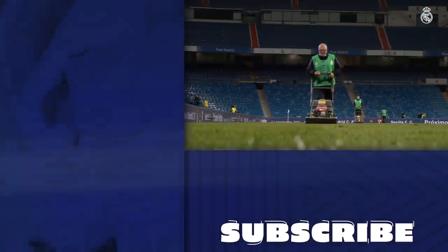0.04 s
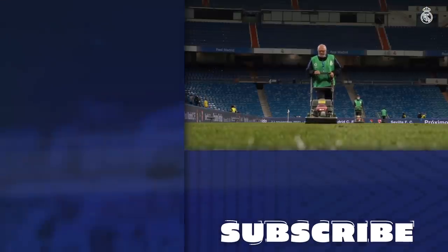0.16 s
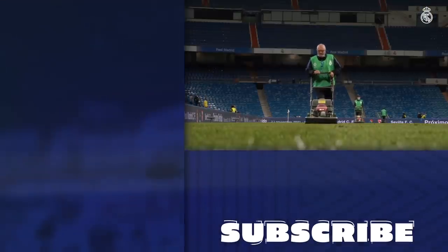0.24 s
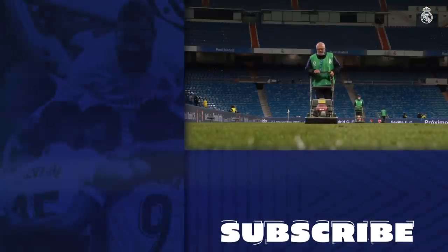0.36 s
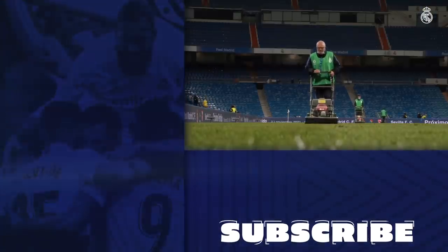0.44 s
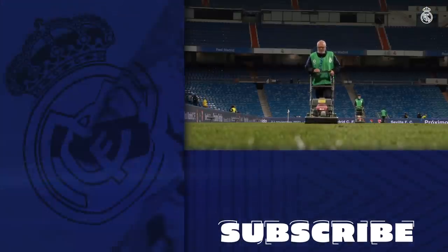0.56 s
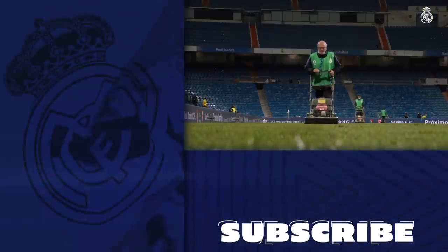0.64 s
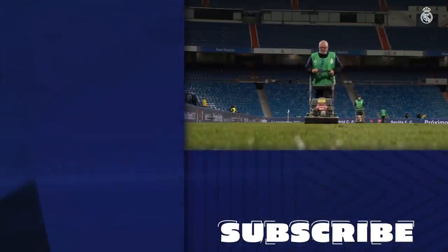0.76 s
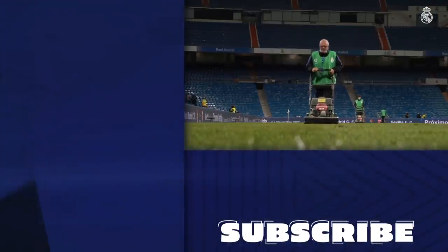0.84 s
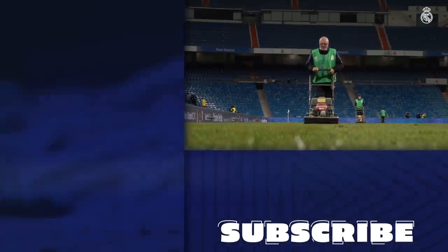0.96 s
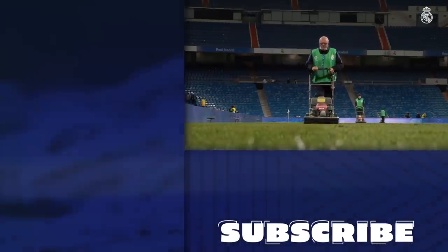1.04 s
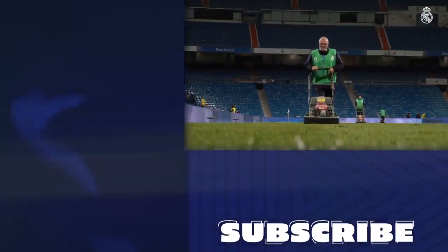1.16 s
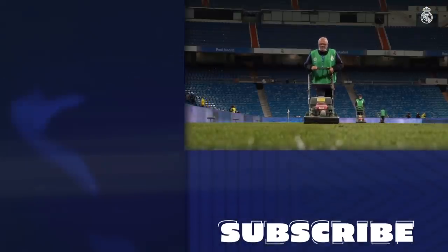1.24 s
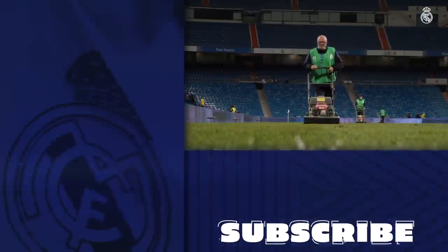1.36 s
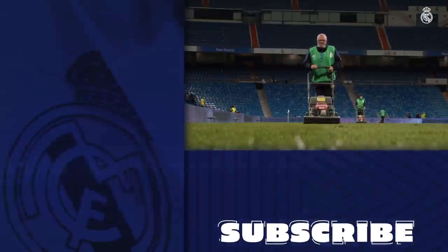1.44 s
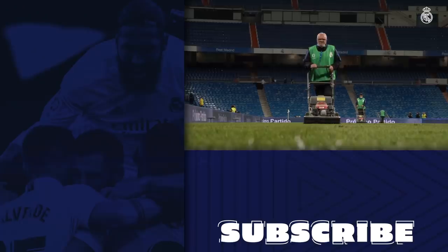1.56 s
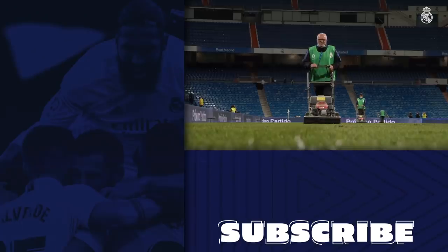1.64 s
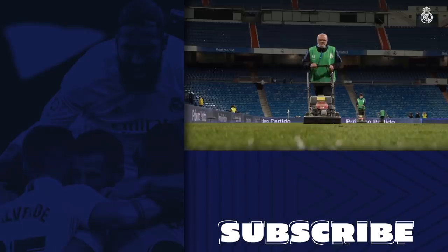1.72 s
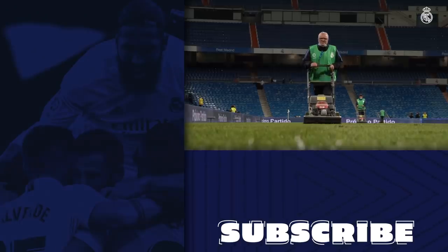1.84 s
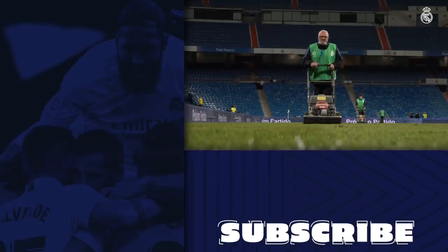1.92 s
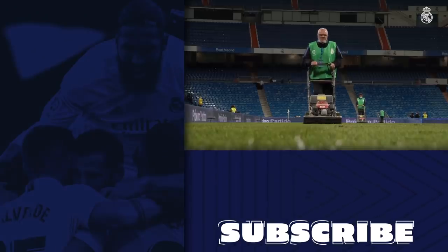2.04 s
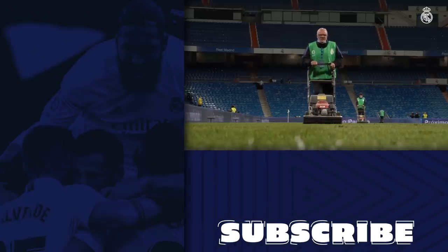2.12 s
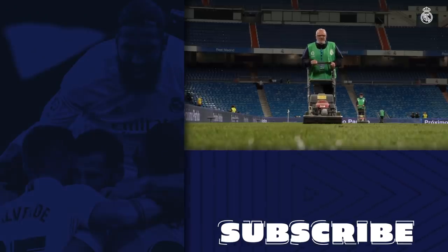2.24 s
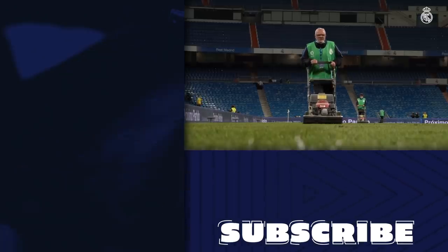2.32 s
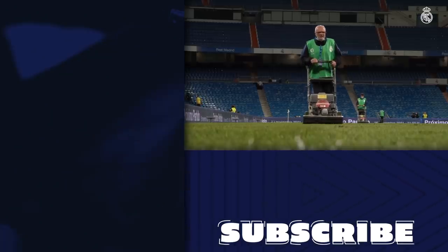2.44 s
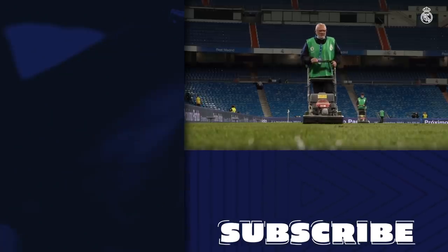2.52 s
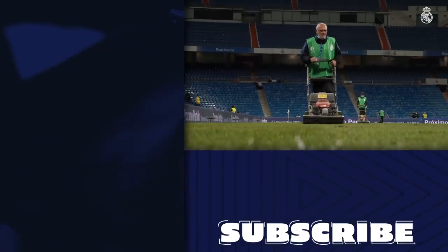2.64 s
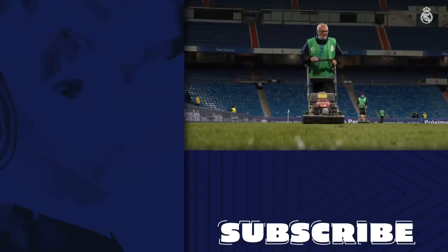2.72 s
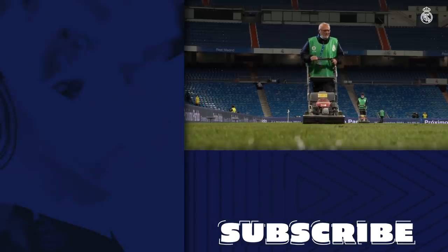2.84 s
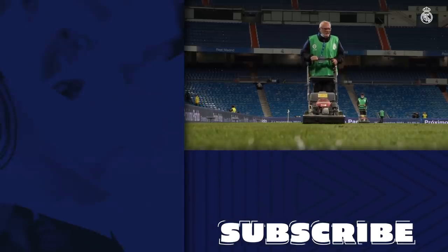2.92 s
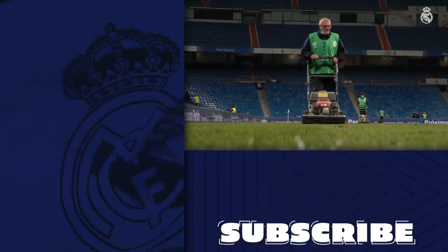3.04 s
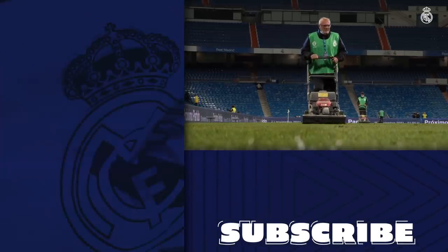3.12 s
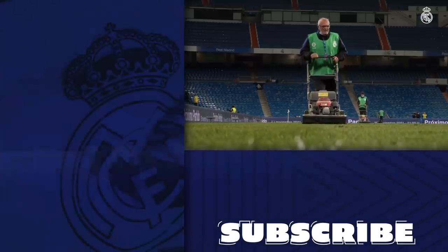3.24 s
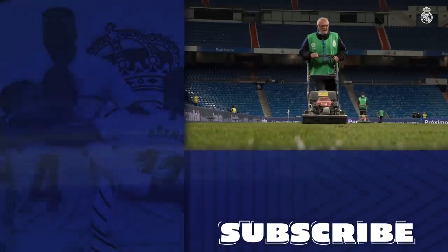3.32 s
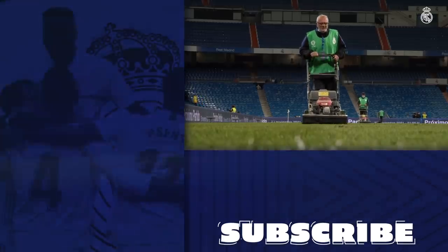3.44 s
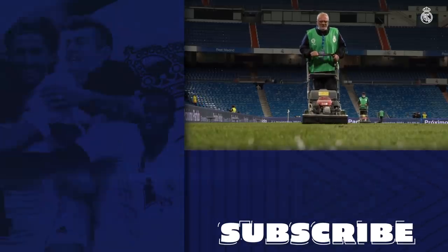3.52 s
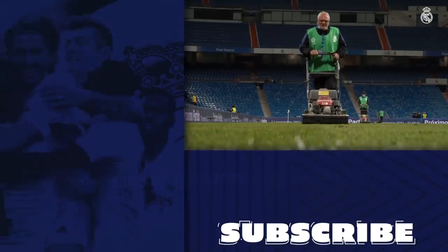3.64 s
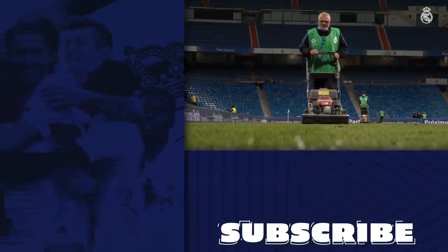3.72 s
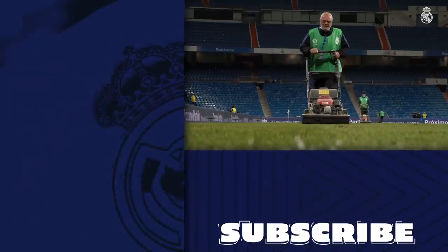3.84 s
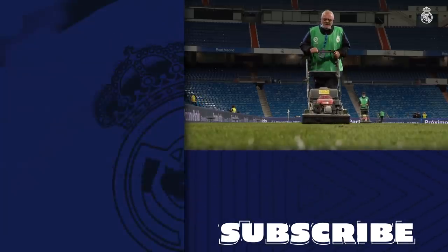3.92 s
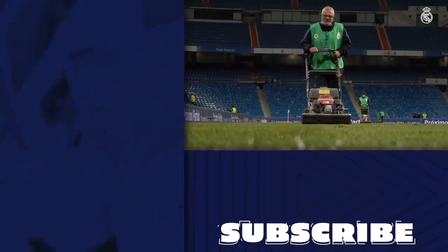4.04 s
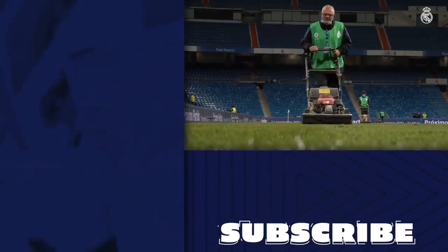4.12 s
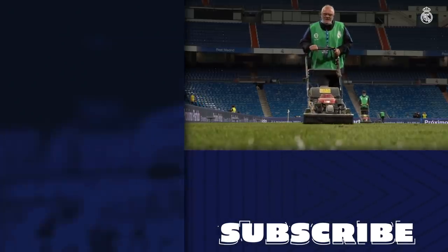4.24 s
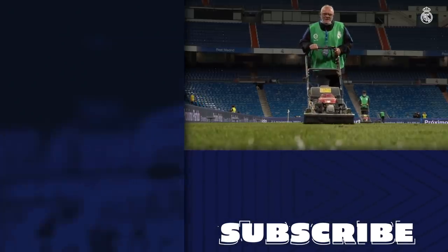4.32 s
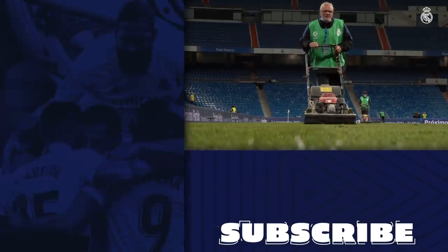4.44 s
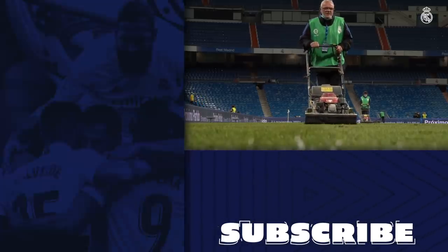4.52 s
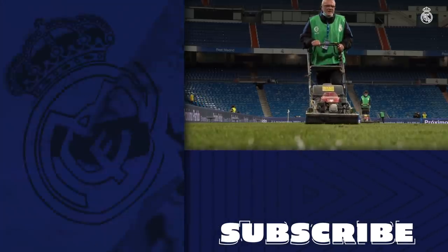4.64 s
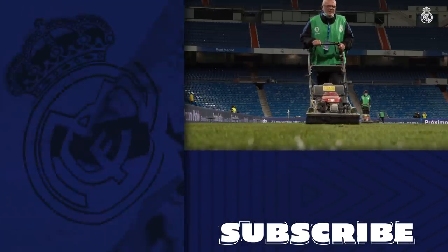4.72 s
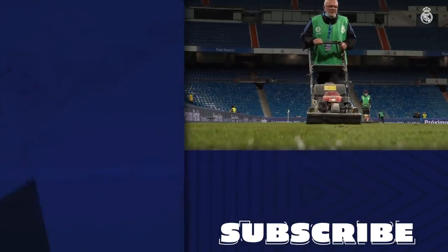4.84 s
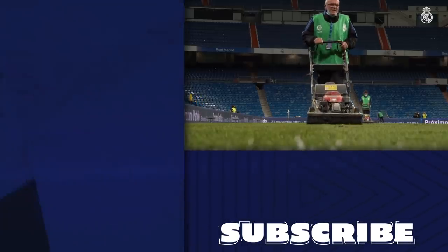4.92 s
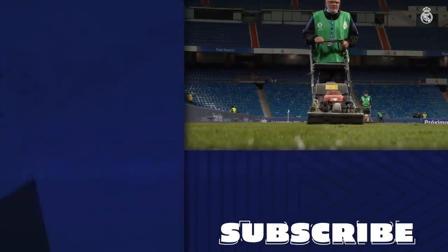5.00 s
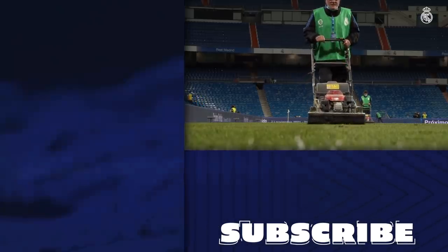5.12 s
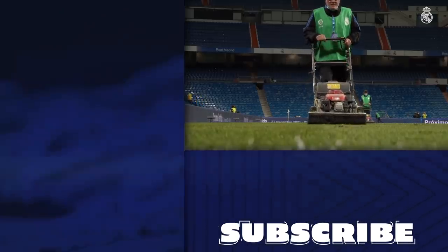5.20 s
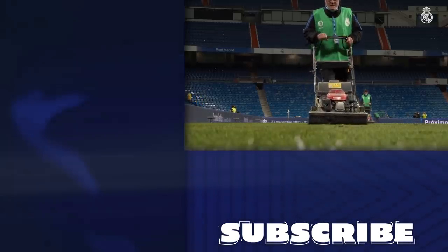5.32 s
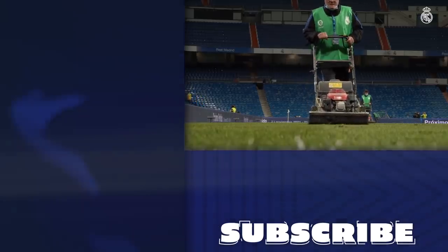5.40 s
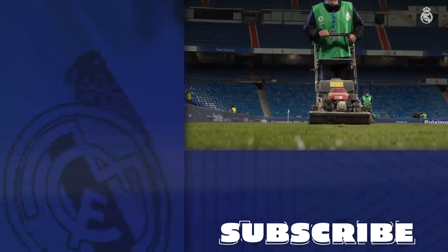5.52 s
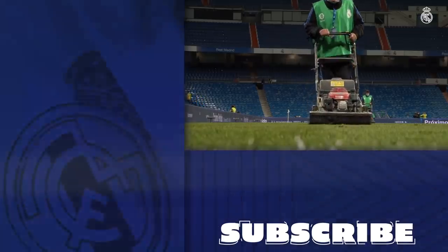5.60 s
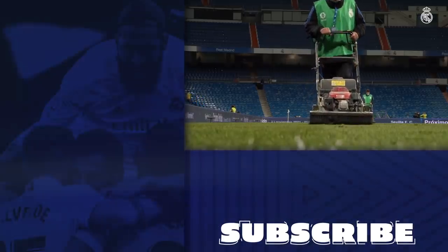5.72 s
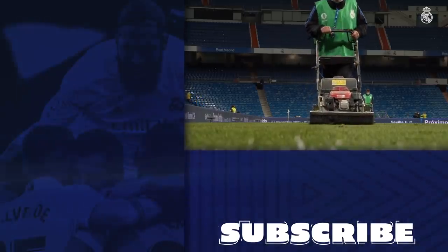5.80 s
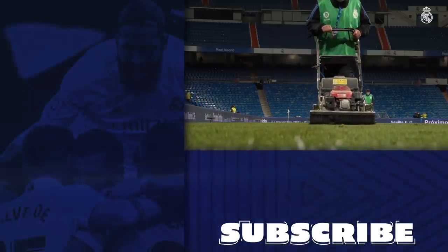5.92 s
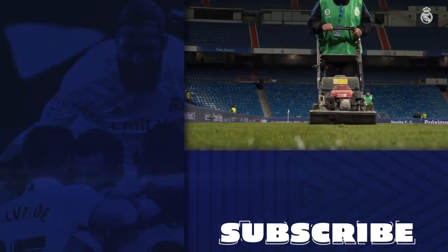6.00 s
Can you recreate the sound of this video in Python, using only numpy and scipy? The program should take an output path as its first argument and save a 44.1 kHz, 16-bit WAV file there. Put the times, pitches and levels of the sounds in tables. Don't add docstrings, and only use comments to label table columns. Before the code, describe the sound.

A single-cylinder petrol mower runs without pause, about thirty rapid exhaust thumps a second blending into a rough, buzzing putter. A strong low blade hum beats gently against it, with airy roar and fine metallic ticking above. Pushed over stadium grass towards a low, fixed microphone, it gradually grows louder and brighter. The stand returns a close, blurred echo, and distant mowers drone faintly.

```python
import sys
import numpy as np
from scipy import signal
from scipy.fft import rfft, irfft
from scipy.io import wavfile
from scipy.ndimage import uniform_filter1d

SR = 44100
rng = np.random.default_rng(int(sys.argv[2]) if len(sys.argv) > 2 else 0)


def master(y):
    cut = np.clip(np.atleast_2d(y).T, -1, 1)
    pcm = np.round(cut * 32767)
    wavfile.write(sys.argv[1], SR, pcm.astype(np.int16))


def invert_db(x):
    u = np.asarray(x, float) / 20
    return 10 ** u


N = 267378
TIME = np.arange(N) / SR
START_M, WALK_M_PER_S = 12.0, 1.0
ROAR_DB = -30.5
POP_CYCLE, THUMP_CYCLE = .862, .905
BLADE_RATIO = 3.9867
ECHO_RATE = 1 - .384 / 343
ECHO_CYCLE, ECHO_TURN = .694, .165


def rms_one(x):
    return x / np.sqrt(np.mean(x ** 2) + 1e-20)


def drift(rate):
    r = np.exp(-80 * np.pi * rate / SR)
    noise = rng.standard_normal(N // 40 + 2002)
    slow = signal.lfilter([1], [1, -2 * r, r * r], noise)[2000:]
    slow = rms_one(slow - slow.mean())
    return np.interp(np.arange(N) / 40, np.arange(len(slow)), slow)


def coloured(spectrum):
    hz = np.arange(1, N // 2 + 2) * SR / N
    point_hz, point_db = np.transpose(spectrum)
    db = np.interp(np.log(hz), np.log(point_hz), point_db, left=-90, right=-90)
    return irfft(rfft(rng.standard_normal(N)) * invert_db(db), N)


def band(x, low_hz, high_hz):
    return signal.sosfilt(signal.butter(2, [low_hz, high_hz], "band", fs=SR, output="sos"), x)


def resonance(x, hz, width_hz):
    r = np.exp(-np.pi * width_hz / SR)
    poles = [1, -2 * r * np.cos(2 * np.pi * hz / SR), r * r]
    return signal.lfilter([(1 - r * r) / 2, 0, (r * r - 1) / 2], poles, x)


def strikes(cycles, point, spread_db):
    turn = np.floor(cycles - point).astype(int) + 1
    strength = invert_db(spread_db * np.clip(rng.standard_normal(200), -2, 2))
    return np.diff(turn, prepend=turn[0]) * strength[turn] + 1e-18


def tone(db, cycles):
    return np.sqrt(2) * invert_db(db) * np.cos(2 * np.pi * cycles)


def nearing_db():
    return -20 * np.log10(1 - WALK_M_PER_S * TIME / START_M)


# [level_db of orders 1, 2, 3 ..]
FAR_MOWERS = [
    (32.87, [-60, -46, -52, -34, -44, -37, -39, -48, -48, -50, -55, -42]),
    (34.7, [-62, -50, -54, -37, -49, -47, -50, -52]),
    (26.75, [-58, -49, -58, -56, -57]),
]


def distant_mowers():
    out = np.zeros(N)
    for firings_per_s, levels_db in FAR_MOWERS:
        cycles = np.cumsum(firings_per_s * (1 + 0.00383 * drift(0.466))) / SR
        for order, db in enumerate(levels_db, 1):
            out += tone(db + 3.34 * drift(1.26), order * cycles + rng.random())
    return out


# start_s (its middle), half_length_s, level_db, low_hz, high_hz
CLIPPINGS = (2.63, .08, -58, 5200, 7300)


def swish():
    middle_s, half_s, db, low_hz, high_hz = CLIPPINGS
    swell = np.exp(-((TIME - middle_s) / half_s) ** 2)
    return invert_db(db) * swell * rms_one(band(rng.standard_normal(N), low_hz, high_hz))


# pitch_hz, level_db (per Hz)
HISS_SPECTRUM = [(2500, -33), (4200, 1.5), (4750, -3), (5400, -2.5), (8000, -6), (9600, -9), (10700, -8.5),
                 (12000, -13.5), (13600, -15), (15900, -20)]
# level_6k_db, level_12k_db (over the hiss), decay_ms
CONTACTS = [
    (5, 12, 2.0),
    (-1, 8, 2.6),
    (-4, 0, 1.6),
]
CONTACT_CYCLES = (.862, .155, .440)


def contact_db(low_db, high_db, hz):
    return low_db + np.log2(hz / 6000) * (high_db - low_db)


def hiss_and_ticks(cycles):
    hiss, out = rms_one(coloured(HISS_SPECTRUM)), np.zeros(N)
    edges_hz = [2500, 4400, 5800, 7200, 8600, 10000, 11500, 13000, 14500, 16500]
    blows = [strikes(cycles, point, spread_db=1.5) for point in CONTACT_CYCLES]
    for low, high in zip(edges_hz, edges_hz[1:]):
        flare = 1
        for point, blow, (low_db, high_db, decay_ms) in zip(CONTACT_CYCLES, blows, CONTACTS):
            level = invert_db(contact_db(low_db, high_db, np.sqrt(low * high)))
            clicks = blow * strikes(cycles, point, spread_db=0.0) * level
            flare = flare + signal.lfilter([1], [1, -np.exp(-1000 / (decay_ms * SR))], clicks)
        out += band(flare * band(hiss, low, high), low, high)
    return rms_one(out)


# pitch_hz, level_db, t60_s
VALVE_MODES = [(5900, -3, .010), (7550, -2, .012), (8850, -3, .010), (10400, 0, .014), (10950, -1, .012),
               (12600, -6, .010), (13250, -5, .012), (13850, -7, .010), (15200, -10, .008)]


def valve_rings(cycles):
    out = np.zeros(N)
    for hz, db, t60_s in VALVE_MODES:
        clicks = 0
        for point, (low_db, high_db, _) in zip(CONTACT_CYCLES, CONTACTS):
            clicks = clicks + strikes(cycles, point, spread_db=6.5) * invert_db(contact_db(low_db, high_db, hz))
        r, w = invert_db(-60 / (t60_s * SR)), 2 * np.pi * hz / SR
        out += signal.lfilter([0, invert_db(db) * np.sin(w)], [1, -2 * r * np.cos(w), r * r], clicks)
    return rms_one(out)


def bright_top(cycles):
    turf_db = 0.84 * WALK_M_PER_S * TIME
    db = -61.5 + nearing_db() + turf_db + 0.5 * drift(6.5)
    return invert_db(db) * (hiss_and_ticks(cycles) + invert_db(-13.5) * valve_rings(cycles))


# multiple (of firing rate), level_db (against the roar)
FAN_ORDERS = [(17, -25.5), (34, -16), (51, -21.5)]


def fan_whine(cycles):
    return sum(tone(db + 3 * drift(4.6), k * (cycles + 0.0054 * drift(2.26))) for k, db in FAN_ORDERS)


def panel_ring():
    once = resonance(rng.standard_normal(N), 3896, 90)
    return invert_db(-36.5) * rms_one(resonance(once, 3896, 90))


# pitch_hz, width_hz, level_db
MUFFLER_MODES = [(540, 260, 2), (760, 240, 0), (1140, 240, -1.5), (1520, 260, -11)]


def pops(cycles):
    clicks = -strikes(cycles, POP_CYCLE, spread_db=1.3)
    soft = signal.sosfilt(signal.butter(8, 1580, fs=SR, output="sos"), clicks)
    return rms_one(sum(invert_db(db) * resonance(soft, hz, width_hz) for hz, width_hz, db in MUFFLER_MODES))


def echoed_pops(cycles):
    echo = band(pops(cycles * ECHO_RATE + ECHO_CYCLE), 300, 750)
    return invert_db(-6.9) * (pops(cycles) + invert_db(-7) * echo)


# pitch_hz, level_db (per Hz)
ROAR_SPECTRUM = [(20, -35.5), (45, -32), (110, -13), (230, 2), (330, 1), (650, -1.5), (1150, -2),
                 (1550, -9.5), (1850, -14.5), (2400, -36), (3000, -28), (3750, -24), (4300, -35),
                 (5500, -47.5)]
# pitch_hz, level_db (per Hz)
RASP_SPECTRUM = [(1500, -20), (1800, -4), (2000, 2.5), (2500, -5), (2900, -9.5), (3400, -24)]


def air(cycles):
    near_db = nearing_db()
    roar = coloured(ROAR_SPECTRUM)
    roar = roar / np.std(band(roar, 450, 1700))
    puff = uniform_filter1d(np.exp(-((cycles - POP_CYCLE) % 1) / 0.027), size=70)
    blade_db = 1.1 * np.cos(2 * np.pi * BLADE_RATIO * cycles)
    chop = invert_db(blade_db + 0.4 * puff + 0.58 * drift(5.3))
    body = invert_db(-3.5) * chop * roar + fan_whine(cycles) + panel_ring() + echoed_pops(cycles)
    rasp = invert_db(-60 + 3.19 * near_db) * chop * rms_one(coloured(RASP_SPECTRUM))
    return invert_db(ROAR_DB + near_db) * body + rasp + bright_top(cycles)


# multiple (of pass rate), level_db (against the roar), echo_db (against the direct sound)
BLADE_LOWER = [(1, 4.7, -28), (2, -5, -10.5), (3, -2.4, -13)]
# multiple (of pass rate), level_db (against the 1st)
BLADE_UPPER = [(4, -23.5), (5, -19), (6, -18), (7, -23), (8, -63), (12, -25)]


def blade(cycles):
    start, echo_offset = .45, .385
    skew = .36
    near_db = ROAR_DB + nearing_db()
    turned = BLADE_RATIO * (cycles - THUMP_CYCLE)
    passes = turned + start
    echoed = turned * ECHO_RATE + start + echo_offset
    hum = 0
    for k, db, echo_db in BLADE_LOWER:
        direct = tone(db, k * passes + skew)
        echo = tone(db + echo_db, k * echoed + skew + ECHO_TURN)
        hum = hum + invert_db(near_db + 0.94 * drift(7.3)) * (direct + echo)
    for k, db in BLADE_UPPER:
        hum = hum + tone(near_db + 4.5 + db + 2.4 * drift(2.5), k * passes + 0.06 * drift(4))
    return hum


# multiple (of firing rate), level_db (against the roar), echo_db (against the direct sound)
EXHAUST_ORDERS = [(1, -33, -12), (2, -15, -12), (3, -17, -5.5), (4, -7.5, -9), (5, -3.2, -8),
                  (6, -2.3, -4.5), (7, -.3, -20), (8, -10, -9), (9, -3.3, -5.5), (10, -6.5, -7.5),
                  (11, -15, -8), (12, -10.5, -8), (13, -13, -6), (14, -15.5, -12), (15, -17, -8),
                  (16, -18, -6)]


def exhaust(cycles):
    pipe_turn = -.11
    since = cycles - THUMP_CYCLE
    echoed = since * ECHO_RATE + ECHO_CYCLE
    near_db, thump = ROAR_DB + nearing_db(), 0
    for k, db, echo_db in EXHAUST_ORDERS:
        direct = tone(db, k * since + pipe_turn)
        echo = tone(db + echo_db, k * echoed + pipe_turn + ECHO_TURN)
        thump = thump + invert_db(near_db + 0.5 * drift(2.2)) * (direct + echo)
    return -thump * invert_db(0.38 * drift(30))


# start_s, firings_per_s
ENGINE_SPEED = [(0.0, 30.61), (0.6, 30.743), (1.0, 30.668), (1.4, 30.62), (1.65, 30.688), (2.1, 30.585),
                (2.5, 30.682), (2.9, 30.693), (3.15, 30.743), (3.45, 30.68), (3.85, 30.709), (4.12, 30.781),
                (4.5, 30.717), (4.9, 30.639), (5.2, 30.615), (5.62, 30.483), (6.06, 30.576)]


def engine_cycles():
    at_s, firings_per_s = np.transpose(ENGINE_SPEED)
    return .061 + np.cumsum(np.interp(TIME, at_s, firings_per_s)) / SR


def scene():
    cycles = engine_cycles()
    return (distant_mowers() + swish() + air(cycles) + blade(cycles) + exhaust(cycles))[None]


def roll_off(x):
    return signal.sosfilt(signal.butter(12, 15700, fs=SR, output="sos"), x)


def record(dry):
    mix = signal.sosfilt(signal.butter(4, 22, "high", fs=SR, output="sos"), dry)
    return roll_off(mix)


dry = scene()
out = record(dry)
master(out)
```